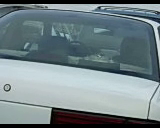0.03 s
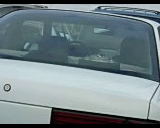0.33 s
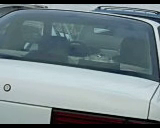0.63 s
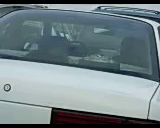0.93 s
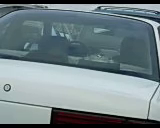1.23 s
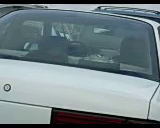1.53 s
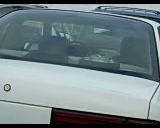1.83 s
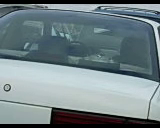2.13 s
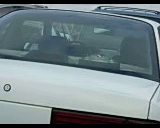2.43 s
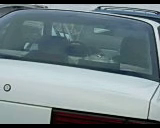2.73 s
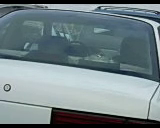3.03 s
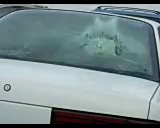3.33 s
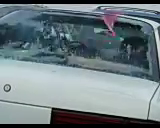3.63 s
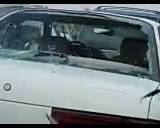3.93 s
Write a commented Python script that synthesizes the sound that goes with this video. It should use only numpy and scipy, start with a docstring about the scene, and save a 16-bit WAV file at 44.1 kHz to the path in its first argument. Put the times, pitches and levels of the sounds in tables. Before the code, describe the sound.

Outdoors in light wind, an engine idles close by and a small motor hums. Then a sudden airbag bang overloads the dull-sounding microphone and shatters a car's rear window, sending glass pattering onto metal and the ground.

```python
"""Airbag blows out a rear window

Outdoors, a three-cylinder engine idles close by; a small motor hums further off and speeds up as it
sheds its load. An airbag fires inside a car and bursts the rear window, and glass crumbs shower onto
the boot lid and the ground. The bang overloads a narrow-band recorder, whose gain stays ducked."""
import sys
import numpy as np
from scipy import signal
from scipy.fft import rfft, irfft
from scipy.io import wavfile
from scipy.ndimage import uniform_filter1d

SR = 44100
rng = np.random.default_rng(int(sys.argv[2]) if len(sys.argv) > 2 else 0)


def log_audio(samples):
    """Write samples as a 16-bit WAV file to the path given in sys.argv[1]."""
    # one column per channel
    frames = np.atleast_2d(samples).T
    # limit to full scale, then quantise
    limited = np.clip(frames, -1, 1)
    pcm = np.round(limited * 32767).astype(np.int16)
    wavfile.write(sys.argv[1], SR, pcm)


N = 176400

# Tone of the blast. Each row: frequency in Hz, relative level in dB.
BLAST_EQ = [(30, -12), (100, 0), (140, 2.5), (180, -1.5), (230, 3), (340, -4), (480, -14), (780, -9.5),
            (1000, -18), (1400, -19), (1800, -24), (3000, -20.5), (4200, -32), (6000, -49)]
# Tone of the glass crumbs. Each row: frequency in Hz, relative level in dB.
CRUMB_EQ = [(200, 5), (300, 2.5), (480, 1.5), (650, 5.5), (1150, 0), (2000, 2), (2800, -2), (3500, -4),
            (4300, -11.5)]
# Swell of the crumb shower. Each row: time in seconds, level in dB.
SHOWER_FADER = [(3.46, -31), (3.53, -32), (3.58, -21), (3.635, -14.5), (3.665, -16.5), (3.695, -14),
                (3.73, -14.5), (3.76, -16), (3.79, -19), (3.85, -15.5), (3.885, -22.5), (3.915, -25.5),
                (3.955, -16), (4, -14)]
# Larger pieces landing. Each row: start in seconds, level in dB, centre and width in Hz, decay in seconds.
SHARD_HITS = [(3.633, -16, 2200, 900, 0.013), (3.677, -11.5, 3540, 1210, 0.015),
              (3.69, -9.5, 1900, 1390, 0.017), (3.745, -14, 1480, 1200, 0.025),
              (3.796, -16, 3370, 350, 0.036), (3.924, -17.5, 3500, 1820, 0.004),
              (3.947, -17.5, 3400, 910, 0.0087), (3.98, -7.5, 1770, 1070, 0.0083),
              (3.98, -11.5, 3200, 1500, 0.0106)]
# Debris hitting the boot lid. Each row: start in seconds, level in dB.
LID_KNOCKS = [(3.483, -11.5), (3.533, -21), (3.614, -19), (3.657, -10), (3.757, -11), (3.819, -20),
              (3.932, -11)]
# Ring of the lid. Each row: pitch in Hz, relative level in dB, decay in seconds.
LID_MODES = [(224, -11, 0.018), (294.6, -6.5, .02), (470, -7, .016), (550, -3.5, 0.012), (696, -1, 0.012),
             (788, 0, .016), (925, -3, 0.014)]
# Low bumps after the burst. Each row: start in seconds, level in dB, decay in seconds.
THUD_HITS = [(3.452, 0, .03), (3.565, -13, 0.044), (3.617, -5, 0.058), (3.775, -14, 0.052),
             (3.895, -12, 0.093)]
# Tone of those bumps. Each row: frequency in Hz, relative level in dB.
THUD_EQ = [(15, -8), (35, 0.5), (70, 3), (130, -4.5), (200, -9), (320, -12), (500, -23), (1500, -51)]
# Cylinders in firing order. Each row: lateness in seconds, level trim in dB, exhaust ring in Hz.
CYLINDER_PUFFS = [(-.0016, -0.87, 75), (.0024, 0.02, 63.6), (.0008, -0.23, 71)]
# Speed of the small motor. Each row: time in seconds, shaft rate in Hz.
SHAFT_SPEED = [(0, 29.5), (.3, 29.6), (.65, 30.15), (1.07, 30.35), (1.33, 29.35), (1.7, 30.15),
               (1.97, 29.85), (2.12, 34), (2.35, 33.4), (2.7, 32.4), (3.1, 32.7), (4, 32.7)]
# Its hum. Each row: multiple of the shaft rate, level under load in dB, level running free in dB.
MOTOR_PARTIALS = [(5, -50.5, -46.5), (6, -32.5, -35.5), (7, -35.5, -49.5), (8, -49, -44.5), (9, -43, -52),
                  (10, -48.5, -57), (12, -47, -54.5), (14, -36, -46.5), (16, -51.5, -58.5), (21, -52, -60),
                  (30, -55, -55)]
# Tone of engine noise and light wind. Each row: frequency in Hz, relative level in dB.
BED_EQ = [(15, 3.5), (30, 5.5), (80, 5.5), (125, -3), (220, -4), (310, -16.5), (400, -11), (520, -17.5),
          (800, -17), (1300, -21), (1500, -23), (1800, -29), (2400, -31.5), (3000, -34.5), (4000, -37),
          (5000, -47)]
# Ring of the idling car's body. Each row: centre in Hz, width in Hz, level in dB.
PANEL_RINGS = [(215.8, 9, -38), (899, 34, -49), (1459, 35, -50.5), (2130, 60, -60.5), (3430, 81, -67)]

BANG_S, SURGE_S, SHATTER_S = 3.409, 3.4355, 3.4535
CRACK_DB, BOOM_DB, ECHO_DB, SHATTER_DB = -8, 11, -26, -5.5
SURGE_HZ, SURGE_DB = 42, 20
CRUMBS_PER_S, CRUMB_SCATTER_DB, CRUMB_RING_S = 4000, 3, .0035
FIRING_HZ, FIRST_FIRING_S = 21.165, .0165
PUFF_DB, PUFF_WIDTH_S, PUFF_LEAD_S = -4, .006588, .0108
PUFF_JITTER_S, PUFF_SCATTER_DB, RING_JITTER_S = .00053, .28, .0013
LOAD_OFF_S, MOTOR_WOBBLE = 1.99, .003
BED_DB, BED_DRIFT_DB, BED_THROB = -24.5, .1, .035
DUCK_THRESHOLD_DB, DUCK_RANGE_DB, DUCK_ATTACK_S, RECOVERY_DB_PER_S = -3.5, 11.5, .016, 2.5
BAND_HZ, TOP_HZ, CEILING, OVERSHOOT = 4080, 15800, .715, 1.075


def undb(db):
    """Decibels to gain."""
    return 10 ** (np.asarray(db) / 20)


def clock():
    """Time of every sample in seconds."""
    return np.arange(N) / SR


def unit(x):
    """Scale to rms 1."""
    return x / (np.std(x) + 1e-12)


def curve(rows):
    """Straight lines through (seconds, value) rows."""
    return np.interp(clock(), *np.array(rows).T)


def wander(rate):
    """Slow random drift, spread near 1."""
    span = int(SR / rate)
    steps = np.repeat(rng.standard_normal(400), span)[:N]
    return 1.26 * uniform_filter1d(uniform_filter1d(steps, span), span)


def equalise(x, points):
    """Shape x with an EQ of (Hz, dB) points, rms 1."""
    hz, db = np.array(points).T
    f = np.maximum(np.arange(N // 2 + 1) * SR / N, 1)
    gain = undb(np.interp(np.log(f), np.log(hz), db))
    return unit(irfft(rfft(x) * gain, N))


def noise(eq):
    """Noise through an EQ, rms 1."""
    return equalise(rng.standard_normal(N), eq)


def resonant_noise(hz, width):
    """Noise in one resonance, rms 1."""
    f = np.maximum(np.arange(N // 2 + 1) * SR / N, 1)
    off_centre = (f - hz * hz / f) / (2 * width)
    return unit(irfft(rfft(rng.standard_normal(N)) / (1 + 2 * off_centre ** 2), N))


def burst(start, rise, hold, fall):
    """Linear attack, hold and exponential release, in seconds."""
    age = clock() - start
    return np.clip(age / rise, 0, 1) * np.exp(-np.clip((age - rise - hold) / fall, 0, 60))


def airbag():
    """The igniter cracks, gas booms, cabin pressure swings as the pane gives way; a faint echo trails."""
    crack = undb(CRACK_DB) * resonant_noise(1800, width=2500) * burst(BANG_S, .0005, 0, fall=.0018)
    boom = undb(BOOM_DB) * noise(BLAST_EQ) * burst(BANG_S, rise=.015, hold=.015, fall=.011)
    swing = -np.sin(2 * np.pi * SURGE_HZ * (clock() - SURGE_S))
    surge = undb(SURGE_DB) * swing * burst(SURGE_S, .0012, 0, fall=.017)
    echo = undb(ECHO_DB) * noise(BLAST_EQ) * burst(BANG_S, .04, 0, fall=.19)
    return crack + boom + surge + echo


def window_glass():
    """The pane shatters, crumbs fly for a moment and shower down; larger pieces break as they land."""
    shatter = undb(SHATTER_DB) * burst(SHATTER_S, .0018, 0, fall=.021)
    shower = undb(curve(SHOWER_FADER)) * (clock() > SHATTER_S)
    shards = sum(undb(db) * resonant_noise(hz, width) * burst(at, .00055, .00071, fall)
                 for at, db, hz, width, fall in SHARD_HITS)
    return (shatter + shower) * crumbs() + shards


def crumbs(pitches=64):
    """A dense rain of tiny glass cubes, each a click with a brief pitched ring."""
    out = np.zeros(N)
    for hz in np.linspace(230, 4400, pitches):
        detune, damping = rng.standard_normal(2)
        lands = rng.random(N) < CRUMBS_PER_S / pitches / SR
        strength = undb(CRUMB_SCATTER_DB * np.minimum(rng.exponential(size=N), 3))
        clicks = lands * strength * np.sign(rng.random(N) - .5)
        decay_rate = np.exp(.5 * damping) / CRUMB_RING_S
        pole = np.exp((2j * np.pi * hz * (1 + .014 * detune) - decay_rate) / SR)
        out += unit(signal.lfilter([1], [1, -pole], clicks + 1e-18).imag)
    return equalise(out, CRUMB_EQ)


def boot_lid():
    """Debris knocks on the sheet metal, each blow stirring its modes differently."""
    t, out = clock(), np.zeros(N)
    for at, db in LID_KNOCKS:
        age = t[t > at] - at
        for hz, mode_db, fall in LID_MODES:
            scatter = rng.standard_normal()
            gain = .5 * np.sign(scatter) * undb(db + mode_db + 2 * scatter)
            ring = np.sin(2 * np.pi * hz * (1 + .03 * scatter) * age)
            out[t > at] += gain * ring * np.exp(-age / fall)
    return out


def thuds():
    """Soft, heavy bumps: the bag flaps out and glass slumps onto the car."""
    return noise(THUD_EQ) * sum(undb(db) * burst(at, .0084, .007, fall) for at, db, fall in THUD_HITS)


def engine_idle():
    """Each firing pushes a short boom out of the exhaust; the three cylinders limp slightly."""
    t, out = clock(), np.zeros(N)
    for k, (slip, size, skew) in enumerate(rng.standard_normal((86, 3))):
        late, db, hz = CYLINDER_PUFFS[k % len(CYLINDER_PUFFS)]
        peak = FIRST_FIRING_S + k / FIRING_HZ + PUFF_LEAD_S + late + PUFF_JITTER_S * slip
        near = slice(*np.searchsorted(t, [peak - 1 / FIRING_HZ, peak + 1 / FIRING_HZ]))
        age = t[near] - peak
        ring = np.cos(2 * np.pi * hz * (age + RING_JITTER_S * skew))
        out[near] += undb(PUFF_DB + db + PUFF_SCATTER_DB * size) * ring / np.cosh(age / PUFF_WIDTH_S)
    return out


def small_motor():
    """A governed motor: its hum wavers under load, then rises and thins as the load comes off."""
    shaft_hz = curve(SHAFT_SPEED) * (1 + MOTOR_WOBBLE * wander(20))
    angle = 2 * np.pi * np.cumsum(shaft_hz) / SR
    crossfade = np.clip((clock() - LOAD_OFF_S) / .065 + .5, 0, 1)
    hum = np.zeros(N)
    for multiple, loaded_db, free_db in MOTOR_PARTIALS:
        db = loaded_db + (free_db - loaded_db) * crossfade + 1.5 * wander(9)
        hum += np.sqrt(2) * undb(db) * np.sin(multiple * angle + 2 * np.pi * rng.random())
    return hum


def noise_bed():
    """Mechanical hiss and light wind, throbbing faintly with the idle, plus ringing body panels."""
    throb = 1 + BED_THROB * np.cos(2 * np.pi * FIRING_HZ * (clock() - FIRST_FIRING_S))
    hiss = noise(BED_EQ) * undb(BED_DB - BED_DRIFT_DB * wander(4.5)) * throb
    return hiss + sum(undb(db) * resonant_noise(hz, width) for hz, width, db in PANEL_RINGS)


def scene():
    """The bang and its debris over the running machines, in mono."""
    backdrop = engine_idle() + small_motor() + noise_bed()
    return (backdrop + airbag() + window_glass() + boot_lid() + thuds())[None]


def record(dry):
    """The gain ducks on the bang and creeps back; the sound saturates, loses its treble and clips."""
    over_db = np.clip(20 * np.log10(np.abs(dry) + 1e-9) - DUCK_THRESHOLD_DB, 0, DUCK_RANGE_DB)
    recovery_db = RECOVERY_DB_PER_S * clock()
    held_db = np.maximum.accumulate(over_db + recovery_db, axis=-1) - recovery_db
    attack = 1 / (DUCK_ATTACK_S * SR)
    ducked = dry * undb(-signal.lfilter([attack], [1, attack - 1], held_db))
    saturated = ducked / (1 + (ducked / (CEILING * OVERSHOOT)) ** 8) ** (1 / 8)
    lowpass = signal.firwin(221, BAND_HZ, window=("kaiser", 8), fs=SR)
    narrow = signal.fftconvolve(saturated, lowpass[None], mode="same")
    clipped = np.clip(narrow, -CEILING, CEILING)
    return signal.sosfilt(signal.ellip(8, .1, 70, TOP_HZ, fs=SR, output="sos"), clipped)


dry = scene()
out = record(dry)
log_audio(out)
```